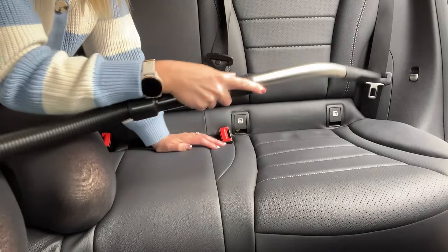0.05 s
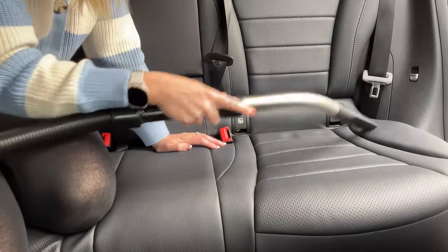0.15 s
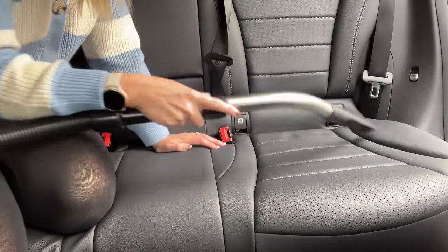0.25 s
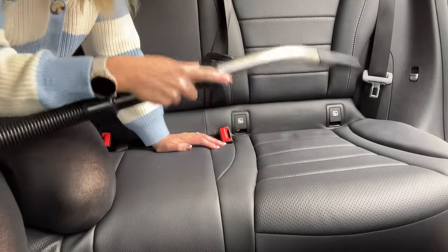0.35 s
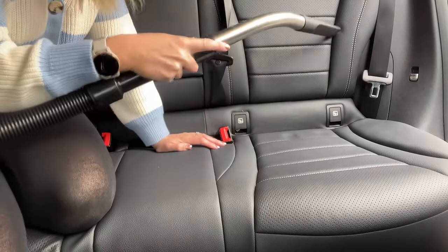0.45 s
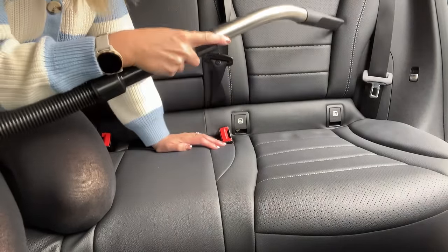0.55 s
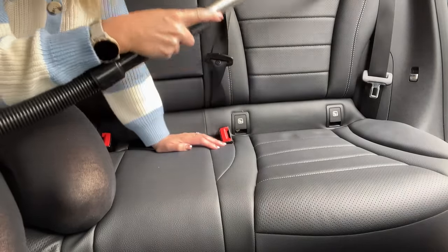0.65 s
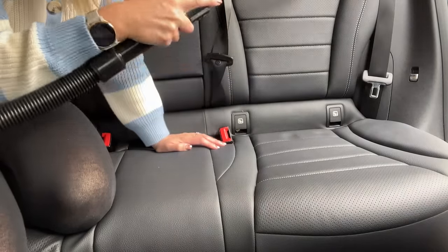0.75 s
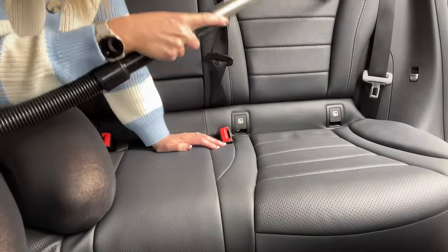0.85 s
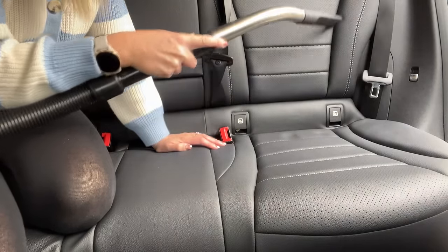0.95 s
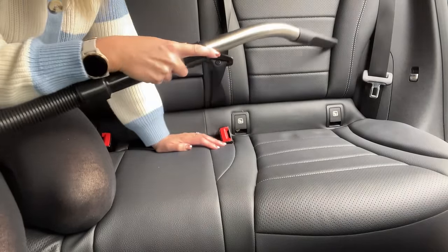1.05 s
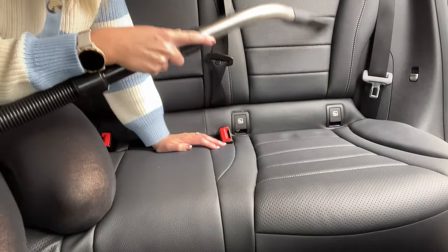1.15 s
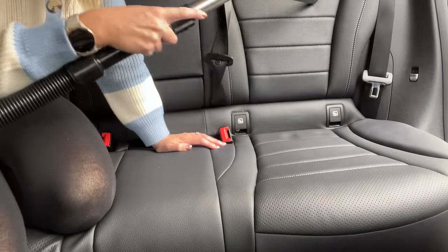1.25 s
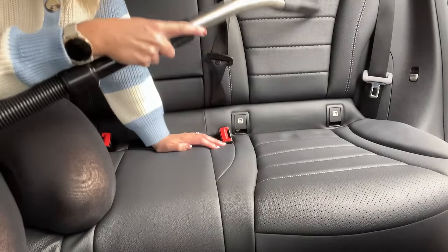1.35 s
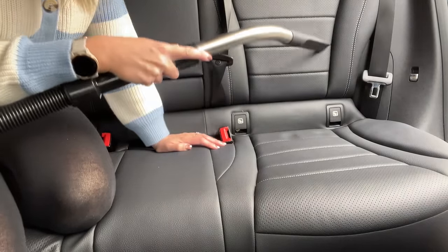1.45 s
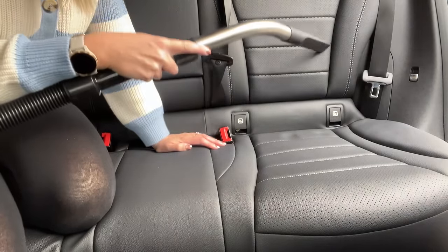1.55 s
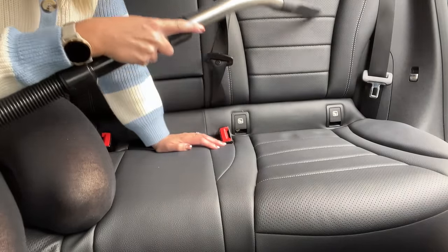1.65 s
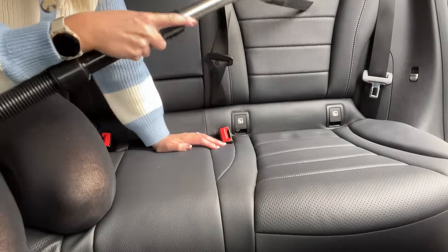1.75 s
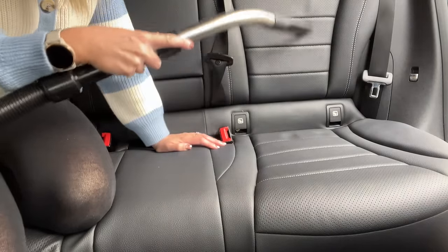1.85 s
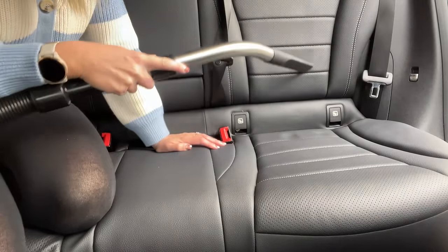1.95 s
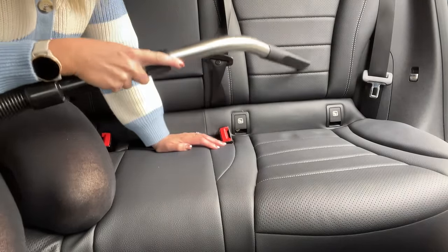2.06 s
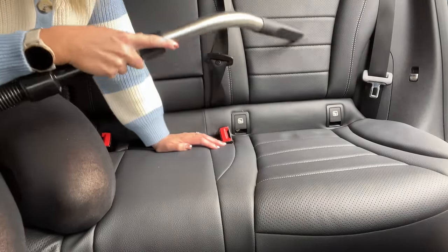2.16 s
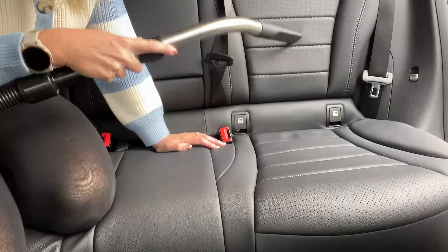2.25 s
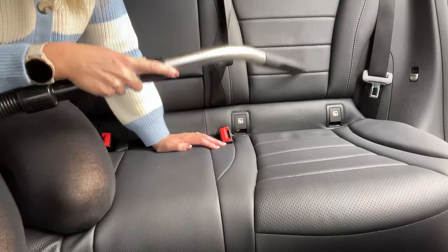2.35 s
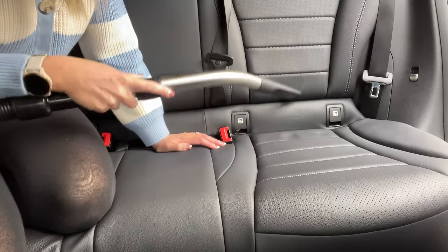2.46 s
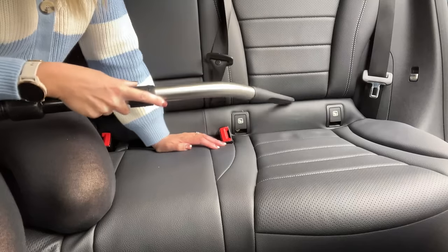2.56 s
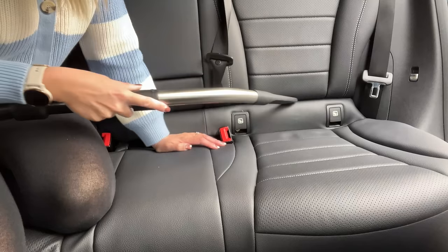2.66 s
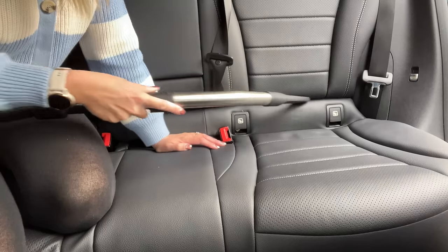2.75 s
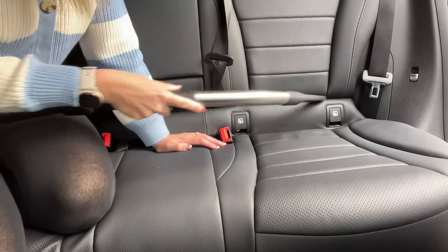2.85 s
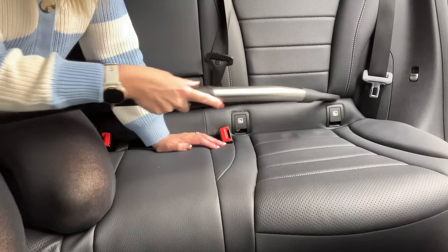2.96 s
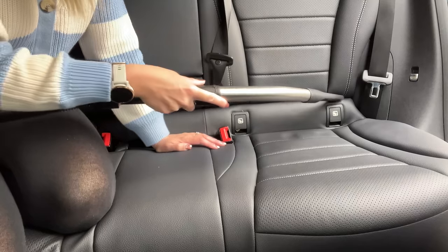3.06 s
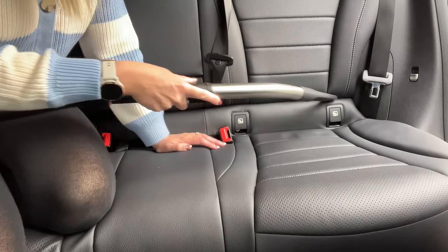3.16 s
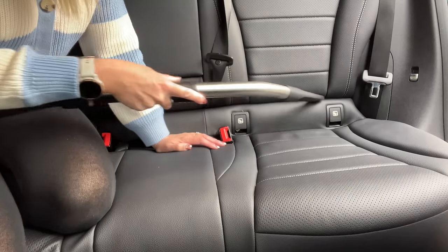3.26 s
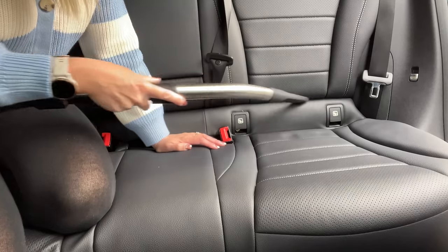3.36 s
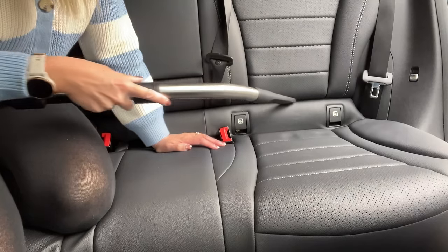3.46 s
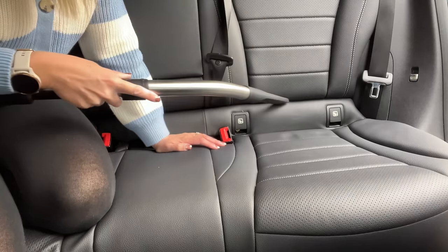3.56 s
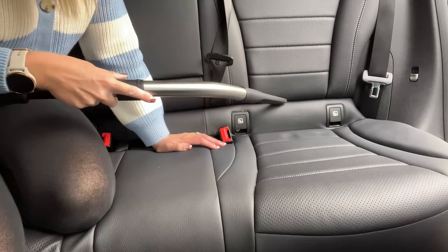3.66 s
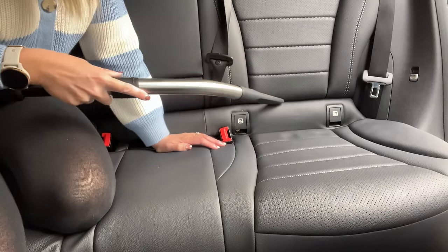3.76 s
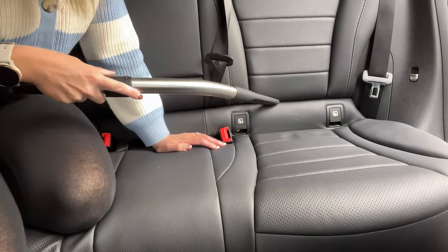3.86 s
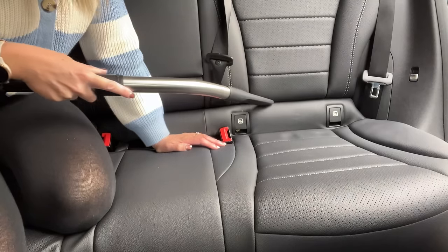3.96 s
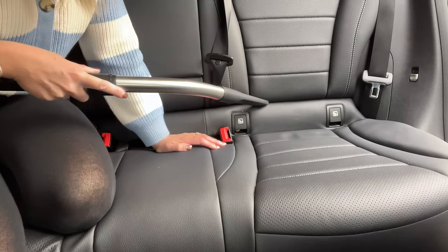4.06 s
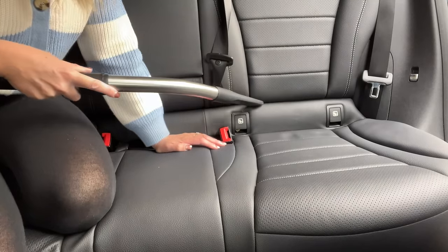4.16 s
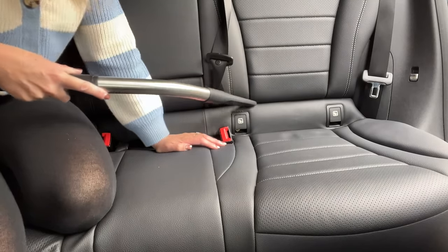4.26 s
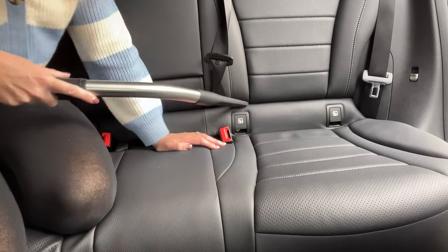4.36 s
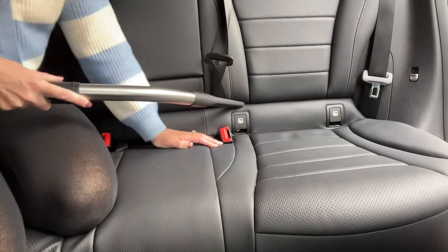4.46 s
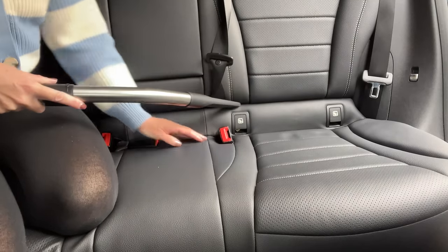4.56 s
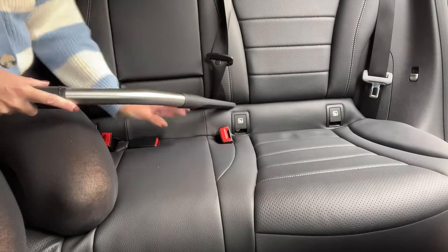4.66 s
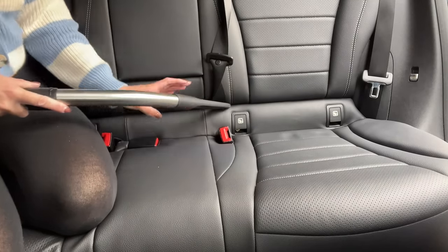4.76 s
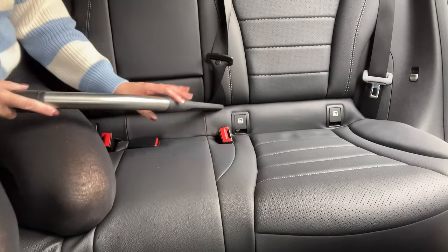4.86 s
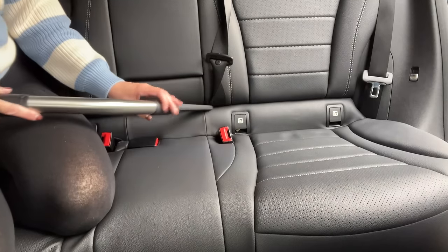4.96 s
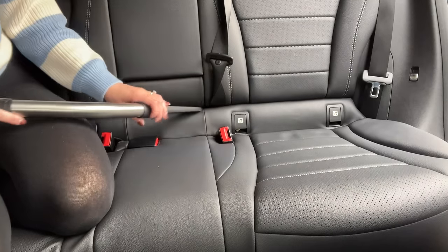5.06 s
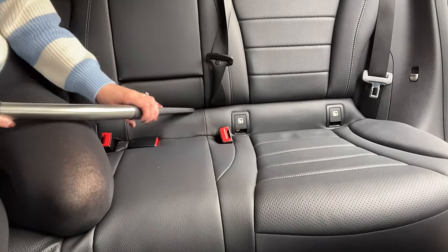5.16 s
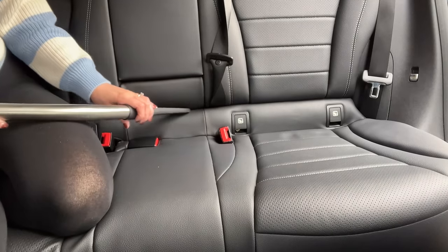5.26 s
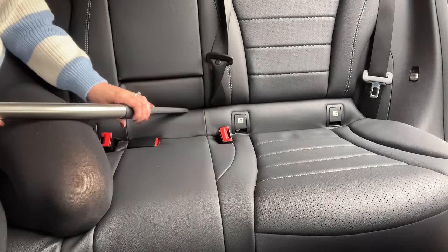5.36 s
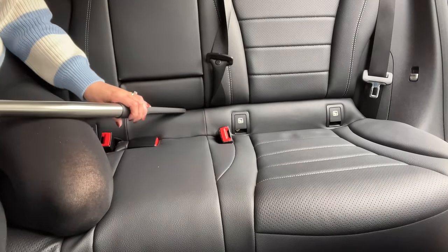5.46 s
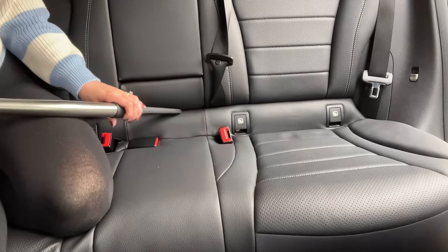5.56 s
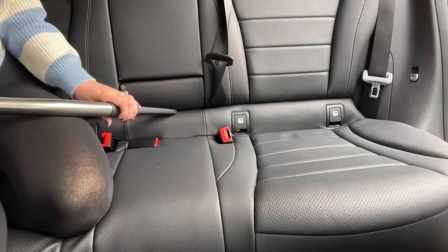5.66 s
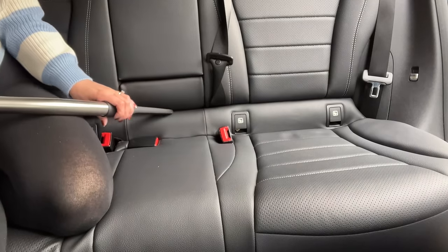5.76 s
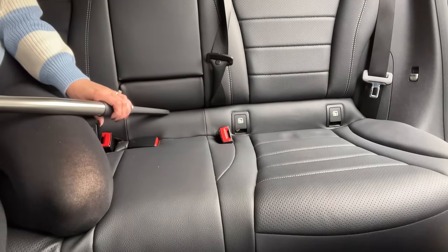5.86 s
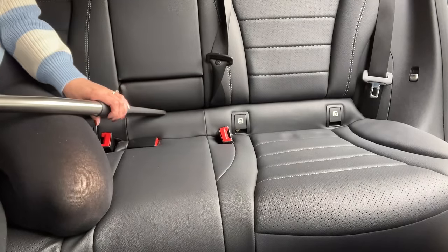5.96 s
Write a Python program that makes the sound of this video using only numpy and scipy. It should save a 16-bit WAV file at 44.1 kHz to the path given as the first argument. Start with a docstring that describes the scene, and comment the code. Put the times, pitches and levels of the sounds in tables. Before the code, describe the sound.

Air hisses through a narrow vacuum nozzle, close to a phone microphone in a car's dry interior. The tip clicks on a belt buckle, then rubs across leather in several quick strokes, each with a swish and soft thuds. About halfway through, the suction becomes a stronger, sharper hiss along the seat crease, drifting from the right toward the centre with brief sliding whistles near the end. A faint motor hum lies underneath.

```python
"""Inside a small padded car cabin, a vacuum's crevice nozzle sweeps the back of a leather seat,
then follows the fold toward the listener. Air hisses and swishes through the gap at the tip, with
breathy whistles, a hollow slurp and the ring of the wand. The tip drags on the leather, snaps
against a belt buckle and bumps the seat; the motor hums faintly outside. All of it is heard
through the two microphone ports of a phone."""
import sys
import numpy as np
from scipy import signal
from scipy.fft import rfft, irfft, next_fast_len
from scipy.io import wavfile
from scipy.ndimage import map_coordinates

SR = 44100
rng = np.random.default_rng(int(sys.argv[2]) if len(sys.argv) > 2 else 0)


def int16_out(signal):
    """Quantize to a 16-bit WAV file."""
    q = np.round(np.clip(np.atleast_2d(signal).T, -1, 1) * 32767)
    wavfile.write(sys.argv[1], SR, q.astype(np.int16))


N = 265041
TIME = np.arange(N) / SR
SIZE = next_fast_len(N + SR // 2)
HZ = np.maximum(np.fft.rfftfreq(SIZE, 1 / SR), 1)

# The four colours of the hiss (body, low end, sharp edge, thin top): f/Hz, relative level/dB
BODY_SPECTRUM = [(2200, -21), (2800, -5.5), (4000, 0), (5500, 0), (6500, 2), (7800, -6)]
LOW_SPECTRUM = [(1000, -10), (1350, 2), (2000, 8), (2600, 3.5), (3200, 2)]
EDGE_SPECTRUM = [(6000, -10.5), (7000, -4.5), (8300, -2.5), (9500, -8), (10500, -15.5)]
TOP_SPECTRUM = [(7600, -20), (9000, -6), (10000, -1), (12000, -2), (14000, -3.5), (17000, -4.5)]
# Bed of leaking air, faint on the seat back, strong in the fold: t/s, body/dB, low/dB, edge/dB, top/dB
AIR_LEAK = [(0, -43, -54, -53, -46), (.07, -42.5, -45, -67, -34), (.6, -30.5, -34.5, -28, -29),
            (.8, -36, -43.5, -35.5, -30.5), (1.35, -40.5, -45, -39, -33.5), (1.55, -43, -39, -46, -30.5),
            (1.8, -39, -47.5, -36, -33.5), (2.38, -51, -50, -46, -36), (2.54, -28, -39.5, -25, -30),
            (2.56, -28, -38.5, -15.5, -24), (2.8, -29.5, -48, -26.5, -27), (3.05, -24, -42, -35.5, -27.5),
            (3.42, -31.5, -43, -19.5, -25), (3.7, -28.5, -42.5, -20, -33), (3.9, -26.5, -40, -20.5, -21.5),
            (4.1, -28.5, -39.5, -22.5, -26), (4.33, -25.5, -38.5, -21.5, -22),
            (4.39, -28.5, -39, -25, -27.5), (4.8, -26, -36.5, -29, -26), (4.99, -21.5, -32, -19.5, -26),
            (5.15, -21, -29.5, -13, -25.5), (5.7, -22, -33.5, -23, -25), (5.82, -24, -35, -21, -27.5),
            (6.01, -23.5, -36, -19.5, -24)]
# The tip presses in or hops a seam: peak t/s, level/dB, rise/s, fall/s, low offset/dB, treble offset/dB
AIR_SWISHES = [(.088, -29, 0.018, 0.037, -29, 3), (0.138, -23, 0.021, 0.017, -4, -2.5),
               (.2, -25, 0.02, 0.11, -14, -6.5), (.275, -22.5, 0.022, 0.015, -16, -5),
               (.385, -32.5, 0.024, 0.019, -5, -7), (.472, -20.5, 0.005, 0.04, -3, -13),
               (.505, -20, 0.031, 0.086, -6.5, -2.5), (0.636, -19.5, 0.013, 0.036, -7.5, -5),
               (.715, -29, .012, 0.01, -18, 1), (.892, -33, 0.017, 0.12, -3.5, 0),
               (0.967, -16.5, 0.018, 0.055, -9.5, -4), (1.014, -16.5, 0.025, 0.071, -5.5, -3.5),
               (1.14, -22.5, 0.11, 0.087, -12, -4), (1.235, -29, 0.033, 0.017, -8.5, 0),
               (1.423, -29, 0.017, 0.033, -8.5, 0.5), (1.5, -26.5, 0.025, 0.091, -9, -1),
               (1.62, -25.5, 0.038, 0.08, -11, 0), (1.7, -27, 0.018, 0.016, -9, 2.5),
               (1.88, -30, 0.011, 0.023, -11, 3.5), (1.941, -28.5, 0.01, 0.026, -16, 1),
               (2.057, -30.5, 0.049, 0.29, -16, 2.5), (2.174, -25, 0.011, 0.02, -12, 2),
               (2.345, -29.5, 0.012, 0.015, -15, 4.5), (2.427, -30, 0.02, 0.12, -21, 4.5),
               (2.549, -20.5, 0.0038, 0.0047, -13, 3.5), (2.965, -23, 0.03, 0.068, -20, 0),
               (3.213, -20, 0.066, 0.1, -15, -3.5), (3.5, -40, 0.014, 0.055, -23, 18),
               (3.562, -18.5, 0.028, 0.07, -18.5, 1.5), (3.72, -27.5, 0.041, 0.078, -10, 9),
               (4.335, -33.5, 0.048, .015, -21, 6.5), (4.7, -28.5, 0.15, 0.014, -10, 6),
               (4.925, -22, 0.12, 0.067, -14, -1.5), (5.022, -24, 0.009, 0.024, -7, 6),
               (5.06, -18, 0.0065, 0.031, -11, 1), (5.27, -20, 0.038, 0.061, -7.5, -2),
               (5.53, -23.5, 0.044, 0.096, -20, -6), (5.783, -25, 0.031, 0.013, -8, -3)]
# The slit's width moves the centre of the sharp edge: t/s, f/Hz
EDGE_PATH = [(0, 8300), (2.55, 8300), (2.85, 9000), (3.05, 7500), (3.2, 9200), (3.4, 8400), (3.56, 7900),
             (3.8, 8100), (4.0, 7500), (4.3, 7500), (4.8, 8000), (5.1, 8000), (5.7, 8800), (6.01, 8400)]
# Tilt of the thin top: t/s, gain an octave above the knee/dB
TOP_TILT = [(0, -21), (2.4, -20), (2.6, 12), (2.95, 4), (3.05, -4), (3.2, 1), (3.6, 2), (4.2, 2),
            (4.7, -21), (5.1, -30), (5.8, -26), (6.01, -12)]
# Bounce off the cushion, then off the wall of the fold: t/s, delay/ms, strength/0-1
SEAT_BOUNCE = [(0, .89, .15), (3.7, .82, .15), (4.99, .69, .12), (5.02, 1.33, .2), (5.15, 1.27, .32),
               (5.55, 1.19, .34), (6.01, 1.02, .3)]
# Air-column resonances of the wand: f/Hz, width/Hz, boost/dB
WAND_MODES = [(460, 550, 7.5), (726, 19, 16), (868, 100, 5.5), (1030, 170, 6.5), (1250, 59, 4.5),
              (2544, 140, 4.5), (4900, 100, 2), (5830, 170, 3.5)]
# The gap narrows or the mouth half closes: t/s, half-length/s, from f/Hz, to f/Hz, width/Hz, level/dB
SLIT_WHISTLES = [(0.665, 0.008, 5130, 4850, 300, -24.5), (2.07, 0.045, 3800, 3730, 250, -37),
                 (2.425, 0.017, 3890, 4580, 400, -26), (2.514, 0.024, 1020, 1033, 98, -30),
                 (2.65, 0.022, 8550, 8200, 400, -25), (3.097, 0.096, 695, 484, 149, -45),
                 (3.2, 0.04, 12330, 9640, 700, -23.5), (3.564, 0.024, 1886, 1926, 200, -27.5),
                 (4.87, 0.0085, 5050, 4600, 150, -22), (4.894, 0.015, 4450, 3970, 120, -22),
                 (4.926, 0.0092, 3890, 3730, 120, -23), (4.946, 0.011, 4130, 4930, 200, -23.5),
                 (4.944, 0.02, 1884, 2213, 199, -26), (5.041, 0.027, 1065, 927, 200, -34),
                 (5.048, 0.0207, 8400, 7770, 900, -12), (5.075, 0.0073, 5180, 4670, 150, -18),
                 (5.08, 0.0066, 4330, 4340, 100, -25), (5.106, 0.015, 4070, 3860, 100, -20),
                 (5.151, 0.014, 4880, 4870, 80, -19.5), (5.281, 0.078, 1840, 1630, 150, -33.5),
                 (5.493, 0.0098, 3990, 3950, 200, -24), (5.701, 0.027, 9060, 8650, 910, -16.5),
                 (5.786, 0.011, 10100, 10060, 400, -19.5), (4.799, 0.49, 1986, 1975, 85, -43),
                 (5.6, 0.33, 2608, 2610, 90, -34.5)]
# Hollow slurp of the half-covered mouth on the first stroke: t/s, f/Hz, level/dB
SLURP_PATH = [(.1, 1100, -60), (.13, 1070, -34), (.165, 980, -33), (.19, 830, -31.5), (.23, 700, -34),
              (.31, 660, -35), (.36, 740, -32), (.39, 900, -33), (.42, 990, -30), (.445, 1090, -34),
              (.48, 1200, -60)]
# Gliding resonances of the pocket between tip and fold, one path each: t/s, f/Hz, level/dB
POCKET_PATHS = [
    [(2.5, 13400, -52), (2.6, 13000, -31), (3.0, 11700, -31), (3.6, 11300, -34.5), (4.0, 12400, -24),
     (4.3, 11900, -28), (4.6, 11980, -39), (5.0, 11800, -35), (5.35, 12360, -28), (5.55, 12500, -45)],
    [(2.65, 11100, -50), (2.75, 11000, -27), (3.0, 9970, -24), (3.1, 9700, -53)],
    [(2.65, 9460, -63), (2.75, 9130, -20), (3.0, 8480, -24.5), (3.4, 8580, -25), (3.5, 8660, -50)],
    [(4.5, 7800, -47), (4.65, 8580, -21), (4.95, 8900, -21), (5.0, 8800, -50)],
    [(4.98, 8170, -50), (5.07, 8380, -34), (5.3, 9700, -24), (5.52, 11140, -31), (5.75, 11770, -32),
     (6.01, 12800, -35)],
    [(5.1, 7500, -50), (5.2, 7570, -34), (5.55, 8500, -17), (5.85, 8150, -30), (6.01, 8260, -34)],
]

# Colours of the drag and of the thuds: f/Hz, relative level/dB
DRAG_SPECTRUM = [(140, -16), (230, -2.5), (280, -7.5), (340, -2), (445, 3), (576, 1), (712, 1.5), (776, 3),
                 (1500, 2), (1950, -49), (3300, -120)]
THUD_SPECTRUM = [(15, -40), (25, -17), (49, 8), (92, 5.5), (151, -4.5), (200, 0), (276, -25), (300, -12.5),
                 (390, -11), (660, -120)]
# The tip slides along the leather: touch t/s, lift t/s, level/dB
TIP_STROKES = [(0.13, 0.448, -33.5), (.5, 0.716, -43.5), (0.881, 1.242, -37.5), (1.41, 1.705, -38.5),
               (1.978, 2.193, -39.5), (2.41, 2.545, -42), (2.906, 3.32, -43)]
# It catches and scrapes harder: peak t/s, level/dB, rise/s, fall/s
TIP_SCRAPES = [(.158, -29.5, 0.035, 0.06), (.415, -33, 0.027, 0.11), (.668, -33, 0.018, 0.057),
               (1.11, -34, 0.022, 0.17), (1.62, -31.5, 0.018, 0.066), (2.34, -39, 0.0086, 0.025),
               (2.425, -30.5, 0.015, 0.02), (2.535, -23.5, 0.041, 0.013), (3.11, -36, 0.094, 0.068),
               (3.56, -35, 0.024, 0.074), (3.775, -39.5, 0.039, .04), (4.7, -40.5, 0.015, 0.045),
               (5.035, -32, 0.033, 0.049), (5.22, -48, 0.033, 0.19)]
# Tip or hose bumps the seat: peak t/s, level/dB
SEAT_BUMPS = [(.16, -30.5), (.475, -35.5), (0.559, -51), (.688, -38.5), (.905, -38.5), (1.24, -38.5),
              (1.455, -33), (1.738, -34.5), (1.9, -35.5), (1.95, -33.5), (2.188, -39), (2.34, -39),
              (2.426, -36.5), (2.568, -42), (2.88, -41), (3.295, -43), (3.746, -47), (3.833, -48.5),
              (4.557, -46), (5.04, -48)]
# Light drag and rumble that never stop: t/s, drag/dB, rumble/dB
HANDLING_BED = [(0, -44, -45.5), (.8, -45.5, -44), (1.6, -46, -42.5), (2.3, -47, -45), (2.7, -41.5, -49),
                (3.2, -42.5, -47), (3.5, -43, -43.5), (4.0, -42.5, -51.5), (4.6, -43.5, -51),
                (5.2, -42.5, -55.5), (6.01, -45.5, -56)]
# Rumble common to both ports: f/Hz, power share/0-1
THUD_COMMON = [(40, .45), (80, .35), (150, .7), (300, .92)]
# The tip snaps against the buckle: t/s, level/dB, from f/Hz, to f/Hz, half-length/s
BUCKLE_SNAPS = [(.136, -4, 3000, 6700, .0011), (.1381, -6.5, 6400, 6600, .0014)]
# Partials of the motor: f/Hz, starting level/dB
MOTOR_PARTIALS = [(98, -49.5), (194, -65.5)]

# The nozzle travels from the right to about centre: t/s, left port's delay/ms
LEFT_LAG = [(0, .26), (.45, .22), (2.4, .19), (2.75, .17), (3.05, .22), (3.4, .19), (4.2, .11), (5.0, .06),
            (5.5, 0.01), (6.01, -.03)]
# Sound that arrives direct rather than off the cabin: f/Hz, power share/0-1
DIRECT_SHARE = [(100, .85), (300, .97), (700, .66), (1500, .64), (2500, .38), (4500, .3), (7000, .6),
                (10000, .9)]
# Phase of the direct sound between the ports: f/Hz, left lead/rad
LEFT_PHASE = [(300, 0), (400, -.1), (650, -1.0), (1200, -.2), (6000, -.3)]
# Tone of the left port against the right: f/Hz, gain/dB
LEFT_COLOUR = [(100, -.9), (250, 0), (450, 2.5), (700, -2.5), (1200, -2.5), (2800, -1), (4000, -3.5),
               (7000, -3.5), (9500, 0)]
# The left side loses some sharp hiss at the end: t/s, gain/dB
LEFT_DIP = [(0, 0), (4.9, 0), (5.05, -3.5), (5.5, -3), (6.01, -2)]


def gap_hiss(edge_trim_db=-1, edge_rest_hz=8300):
    """Air rushes through a fluttering gap: four bands of hiss waver together and a little apart."""
    low_db, treble_db = np.transpose(AIR_SWISHES)[4:]
    swish_colours = amp([np.zeros_like(low_db), low_db, treble_db + edge_trim_db, treble_db]) ** 2
    swishes = np.array([swell(*row[:4]) for row in AIR_SWISHES])
    power = amp(in_time(AIR_LEAK)) ** 2 + swish_colours @ swishes
    body, low, edge, top = np.sqrt(power) * flutter(1, 14)
    body *= flutter(.27, 20) * turbulence(BODY_SPECTRUM, grain_db=0)
    low *= flutter(.66, 36) * turbulence(LOW_SPECTRUM, grain_db=.5)
    edge_shift_hz = in_time(EDGE_PATH)[0] - edge_rest_hz
    edge *= flutter(1, 12) * shifted(turbulence(EDGE_SPECTRUM, grain_db=1.76), edge_shift_hz)
    top *= flutter(.98, 35) * tilted(turbulence(TOP_SPECTRUM, grain_db=.2), in_time(TOP_TILT)[0])
    bright = edge + top
    return body + low + bright + seat_bounce(bright)


def turbulence(spectrum, grain_db):
    """Noise of uneven eddies, coloured by a spectrum and the wand; rms 1."""
    eddies = rng.standard_normal(N) * flutter(grain_db, 220)
    in_band = (HZ > spectrum[0][0]) & (HZ < spectrum[-1][0])
    return unit_rms(filtered(eddies, amp(at_hz(spectrum)) * in_band * wand_ring()))


def wand_ring():
    """Response of the wand's air column, which lifts its own resonances out of the noise."""
    return 1 + sum((amp(db) - 1) / (1 + (2 * (HZ - hz) / width) ** 2) for hz, width, db in WAND_MODES)


def seat_bounce(bright):
    """Only short waves bounce cleanly off the small surfaces; the moving echo combs the treble."""
    delay_ms, strength = in_time(SEAT_BOUNCE)
    return strength * flutter(3, 6) * delayed(bright, delay_ms + .012 * drift(5))


def slit_whistles():
    """Brief breathy whistles that slide in pitch as the air squeezes through a slit."""
    out = 0
    for s, half_length, from_hz, to_hz, width_hz, db in SLIT_WHISTLES:
        envelope, phase = glide(s, half_length, from_hz, to_hz, reach=3)
        out += amp(db) * envelope * breathy(phase, width_hz)
    return out


def cavity_resonance(path, width_hz):
    """A hollow at the tip rings as a gliding band of noise while the leather covers and frees it."""
    hz, db = in_time(path)
    sounding = (TIME > path[0][0]) & (TIME < path[-1][0])
    phase = 2 * np.pi * np.cumsum(hz) / SR
    return sounding * amp(db) * flutter(2.25, 13) * breathy(phase, width_hz)


def leather_drag(touch_s=.012, lift_s=.014):
    """Plastic rubs on leather: held strokes and harder scrapes over a light bed of friction."""
    power = amp(in_time(HANDLING_BED)[0]) ** 2 + sum(swell(*row) for row in TIP_SCRAPES)
    for touch, lift, db in TIP_STROKES:
        held = swell(touch, db, touch_s, np.inf)
        released = swell(lift, db, touch_s, lift_s)
        power += np.where(TIME < lift, held, released)
    return np.sqrt(power) * flutter(.53, 28) * turbulence(DRAG_SPECTRUM, grain_db=1)


def seat_thuds():
    """Dull bumps and rumble through seat and hose, partly shared by the two ports."""
    centre, left, right = (turbulence(THUD_SPECTRUM, grain_db=3) for _ in range(3))
    bumps = sum(swell(s, db, rise_s=.035, fall_s=.045) for s, db in SEAT_BUMPS)
    power = amp(in_time(HANDLING_BED)[1]) ** 2 + bumps
    common = at_hz(THUD_COMMON)
    rumble = filtered(centre, np.sqrt(common)) + filtered(np.array([left, right]), np.sqrt(1 - common))
    return np.sqrt(power) * flutter(.59, 9.6) * rumble


def buckle_snaps():
    """The tip strikes the belt buckle: two tiny rising chirps, heard as a sharp snap."""
    out = 0
    for s, db, from_hz, to_hz, half_length in BUCKLE_SNAPS:
        envelope, phase = glide(s, half_length, from_hz, to_hz, reach=4)
        out += amp(db) * envelope * np.sin(phase)
    return out


def motor_hum(rise_db_per_s=.13):
    """The motor outside: a faint rough hum that wavers in level and phase and creeps up slightly."""
    out = 0
    for hz, db in MOTOR_PARTIALS:
        level = amp(db + rise_db_per_s * TIME) * flutter(3, 8)
        out += level * np.sin(2 * np.pi * hz * TIME + 1.5 * drift(7))
    return out


def cabin_reflections(x, t60_s=.04, renew_s=.06):
    """Dense short echoes off glass and padding, different at each port, renewed as the nozzle moves."""
    step, t = int(renew_s * SR), np.arange(SR // 4) / SR
    fade = np.sin(np.pi * np.arange(2 * step) / (2 * step))[None]   # overlaps keep the power even
    padded = np.pad(x, (step, 2 * step))
    out = np.zeros((2, N + 3 * step + len(t)))
    for start in range(0, N + step, step):
        tail = rng.standard_normal((2, len(t))) * amp(-60 * t / t60_s) * (t > .001)
        tail /= np.sqrt(np.sum(tail ** 2, axis=1, keepdims=True))
        echoes = signal.fftconvolve(fade * padded[start:start + 2 * step], tail, axes=1)
        out[:, start:start + echoes.shape[1]] += echoes
    return out[:, step:step + N]


def swell(s, db, rise_s, fall_s):
    """Power envelope: a bell-shaped attack to the peak, then an exponential release."""
    t = TIME - s
    return amp(db) ** 2 * np.exp(-np.where(t < 0, (t / rise_s) ** 2, 2 * t / fall_s))


def glide(s, half_length, from_hz, to_hz, reach):
    """Bell envelope, cut at reach half-lengths each side, and phase of a tone that slides as tanh."""
    t = np.clip((TIME - s) / half_length, -reach, reach)
    turns = half_length * ((from_hz + to_hz) / 2 * t + (to_hz - from_hz) / 2 * np.log(np.cosh(t)))
    return (np.abs(t) < reach) * np.exp(-.5 * t ** 2), 2 * np.pi * turns


def breathy(phase, width_hz):
    """A narrow band of noise that follows a tone's phase."""
    return drift(width_hz, step=10) * np.sin(phase) + drift(width_hz, step=10) * np.cos(phase)


def drift(rate_hz, step=40):
    """Smooth random modulation of spread 1, drawn once every step samples."""
    pole = np.exp(-2 * np.pi * step * rate_hz / SR)
    noise = rng.standard_normal(N // step + 2002)
    slow = signal.lfilter([1], [1, -2 * pole, pole * pole], noise)[2000:]
    return np.interp(np.arange(N) / step, np.arange(len(slow)), unit_rms(slow))


def flutter(depth_db, rate_hz):
    """A gain that wavers at random around 1."""
    return amp(depth_db * drift(rate_hz))


def shifted(x, shift_hz):
    """x with its whole spectrum moved up or down."""
    return np.real(signal.hilbert(x, SIZE)[:N] * np.exp(2j * np.pi * np.cumsum(shift_hz) / SR))


def tilted(x, gain_db, knee_hz=11500):
    """x with its top tilted, reaching gain_db an octave above the knee."""
    upper = filtered(x, np.clip(np.log2(HZ / knee_hz), 0, 1))
    return x + (amp(gain_db) - 1) * upper


def delayed(x, ms):
    """x through a moving delay."""
    return map_coordinates(x, [np.arange(N) - ms * SR / 1000], order=3, mode="nearest")


def filtered(x, response):
    """x through a frequency response."""
    return irfft(rfft(x, SIZE) * response, SIZE)[..., :N]


def in_time(rows):
    """One automation curve for each column after the time."""
    s, *columns = np.transpose(rows)
    return [np.interp(TIME, s, column) for column in columns]


def at_hz(points):
    """A table over frequency as a curve on the filter grid."""
    hz, values = np.transpose(points)
    return np.interp(np.log(HZ), np.log(hz), values)


def amp(db):
    """dB to gain."""
    return 10 ** (np.asarray(db) / 20)


def unit_rms(x):
    """x scaled to rms 1."""
    return x / np.sqrt(np.mean(x ** 2) + 1e-20)


def scene():
    """The stereo mix: direct sound placed by its lag at the left port, cabin scatter, and thuds."""
    air = gap_hiss() + leather_drag() + cavity_resonance(SLURP_PATH, width_hz=200)
    air += sum(cavity_resonance(path, width_hz=680) for path in POCKET_PATHS)
    air += motor_hum()
    whistles, snaps = slit_whistles(), buckle_snaps()
    near = air + amp(3) * whistles + snaps   # whistles beam more than the hiss
    scattered = cabin_reflections(air + amp(-4) * whistles + amp(-10) * snaps)
    direct = np.array([delayed(near, in_time(LEFT_LAG)[0]), near])
    share = at_hz(DIRECT_SHARE)
    port_phase = np.exp(1j * np.outer([1, 0], at_hz(LEFT_PHASE)))
    airborne = filtered(direct, np.sqrt(share) * port_phase) + filtered(scattered, np.sqrt(1 - share))
    return airborne + seat_thuds()


def record(dry):
    """The phone: left treble comes from the right port, inverted and early; soft peaks, a cut top."""
    crossover_hz, lead_ms = 7500, .128
    dip_hz, dip_width_hz, cutoff_hz = 8000, 1100, 15720
    treble = 1 / (1 + (crossover_hz / HZ) ** 14)
    flipped_early = -np.exp(2j * np.pi * HZ * lead_ms / 1000)
    colour = amp(at_hz(LEFT_COLOUR))
    left = filtered(dry[0], colour * np.sqrt(1 - treble))
    left += filtered(dry[1], colour * np.sqrt(treble) * flipped_early)
    sharp_band = filtered(left, np.exp(-((HZ - dip_hz) / dip_width_hz) ** 2))
    left += (amp(in_time(LEFT_DIP)[0]) - 1) * sharp_band
    rounded = .9 * np.tanh(np.array([left, dry[1]]) / .9)
    return signal.sosfilt(signal.ellip(14, .3, 80, cutoff_hz, fs=SR, output="sos"), rounded)


dry = scene()
out = record(dry)
int16_out(out)
```